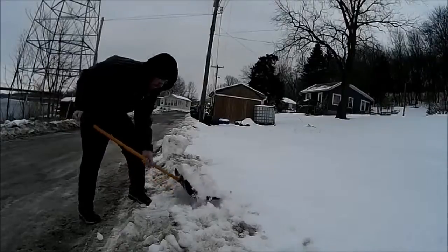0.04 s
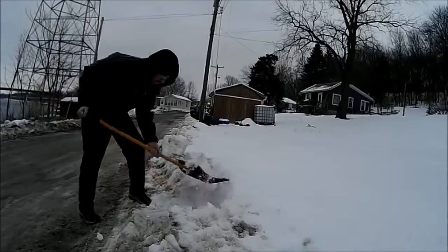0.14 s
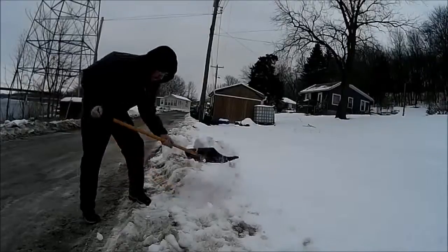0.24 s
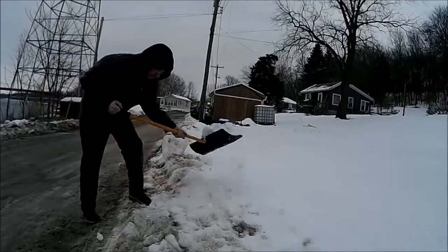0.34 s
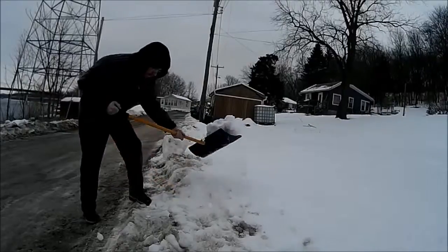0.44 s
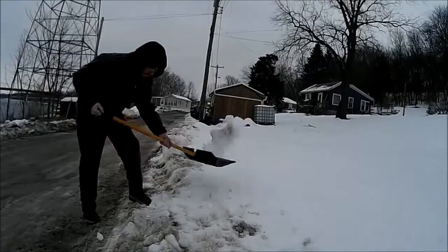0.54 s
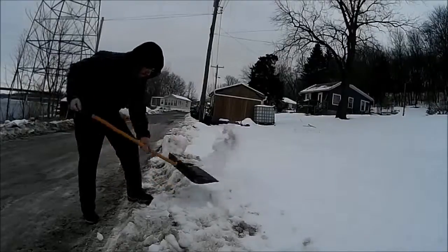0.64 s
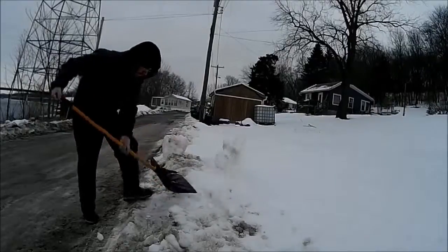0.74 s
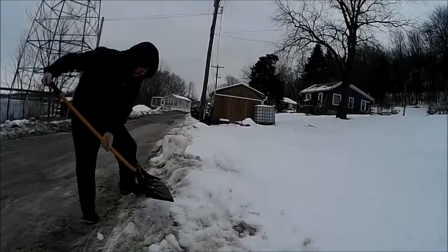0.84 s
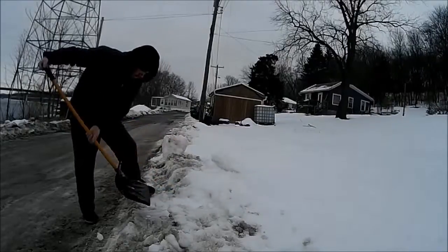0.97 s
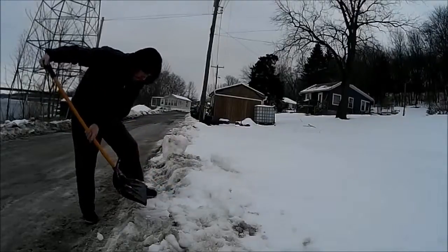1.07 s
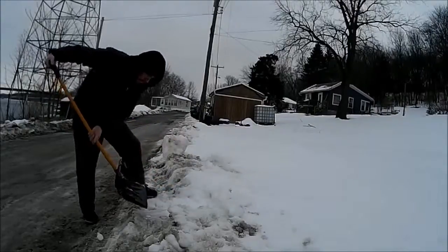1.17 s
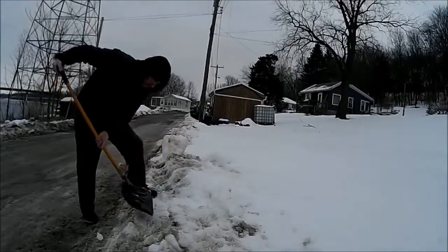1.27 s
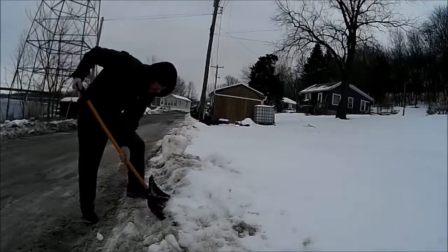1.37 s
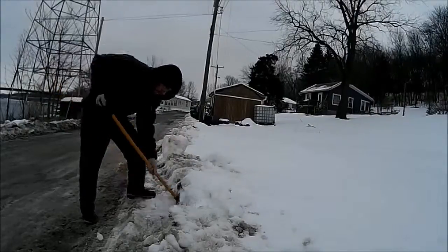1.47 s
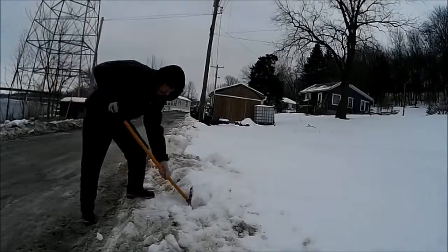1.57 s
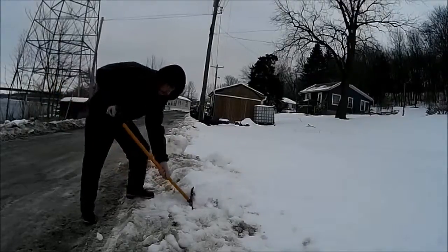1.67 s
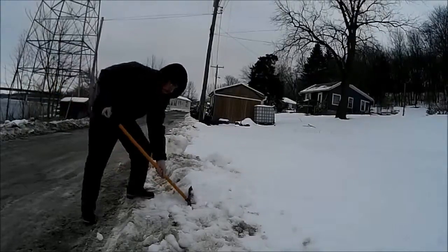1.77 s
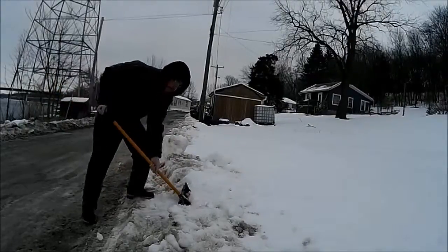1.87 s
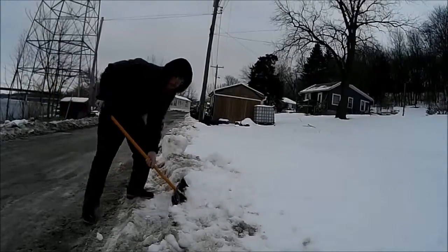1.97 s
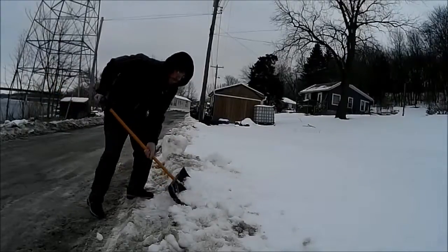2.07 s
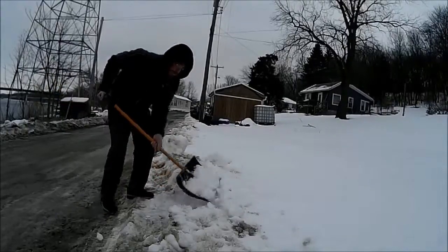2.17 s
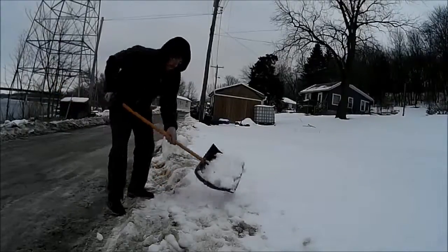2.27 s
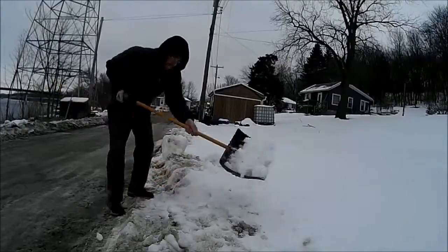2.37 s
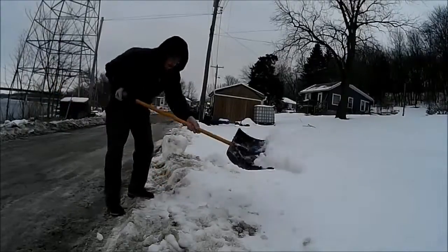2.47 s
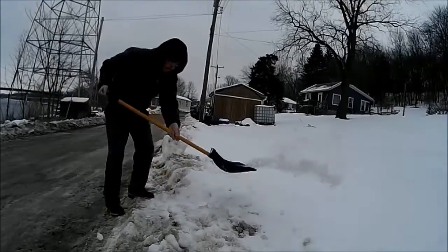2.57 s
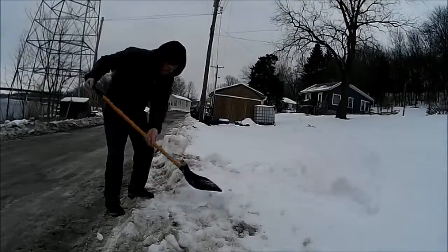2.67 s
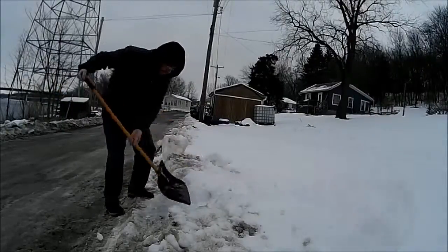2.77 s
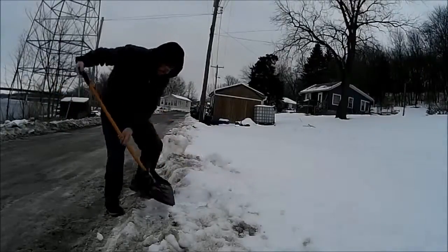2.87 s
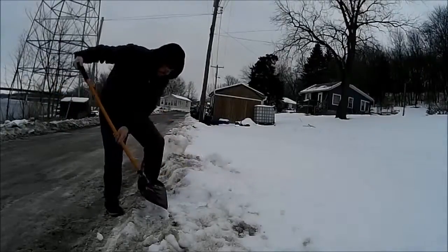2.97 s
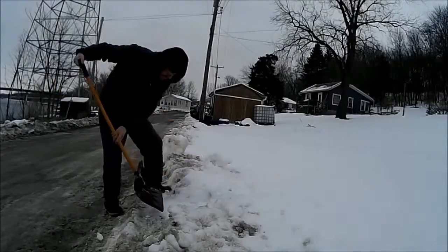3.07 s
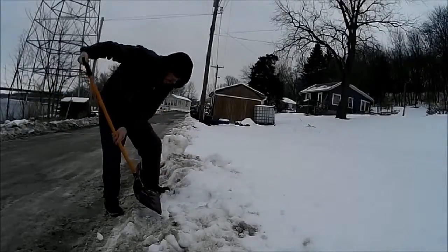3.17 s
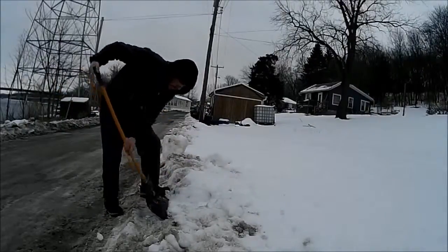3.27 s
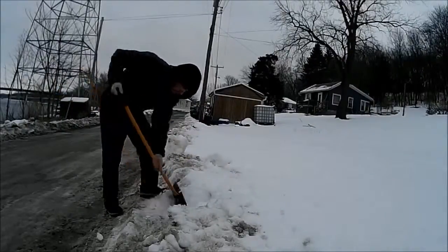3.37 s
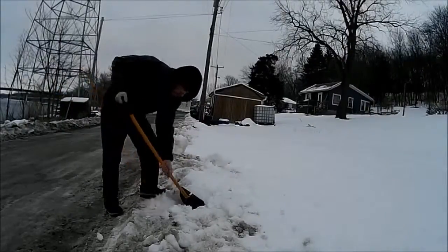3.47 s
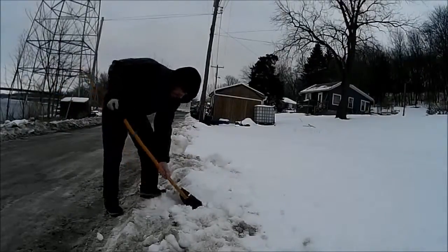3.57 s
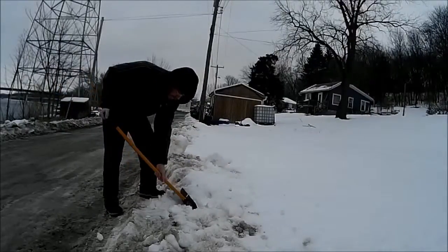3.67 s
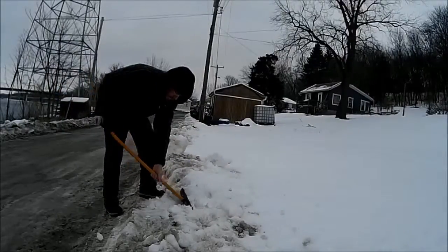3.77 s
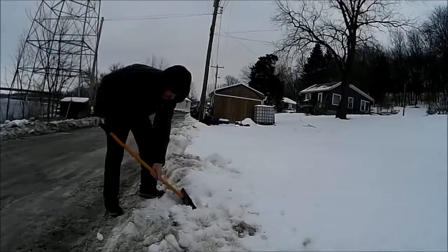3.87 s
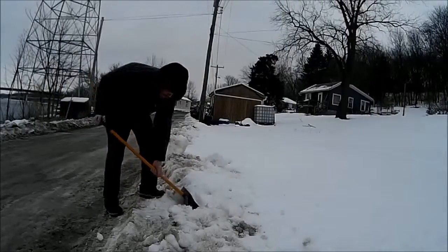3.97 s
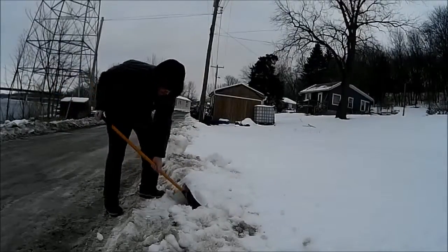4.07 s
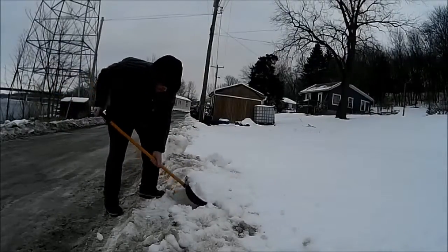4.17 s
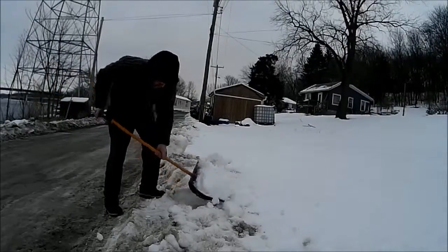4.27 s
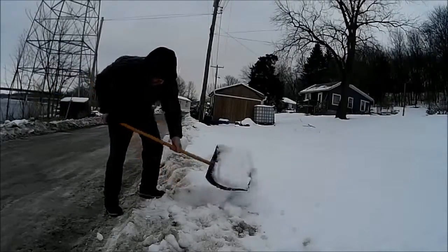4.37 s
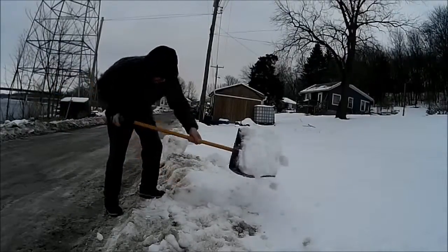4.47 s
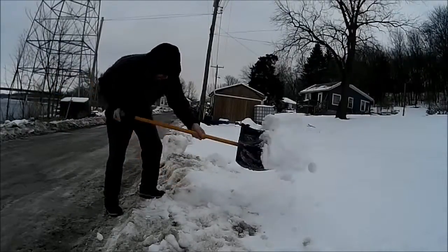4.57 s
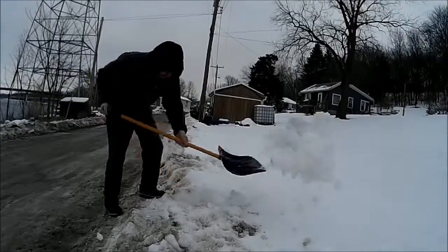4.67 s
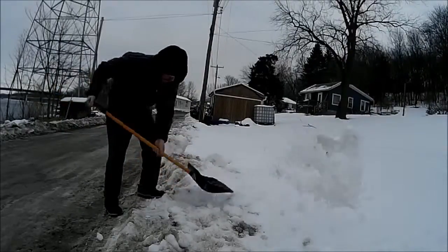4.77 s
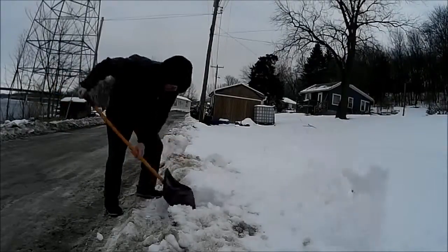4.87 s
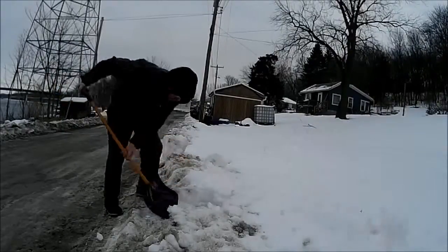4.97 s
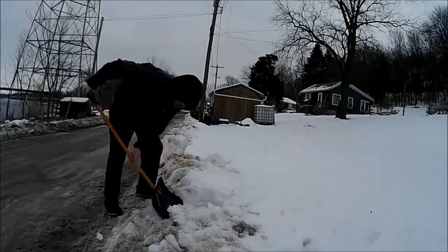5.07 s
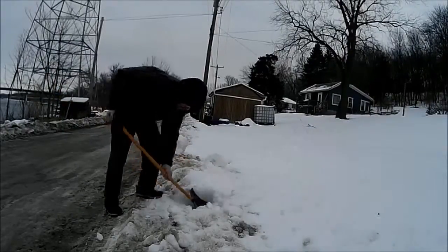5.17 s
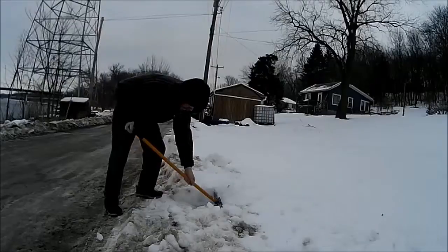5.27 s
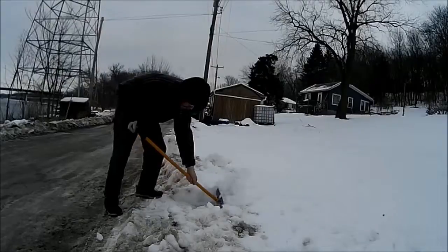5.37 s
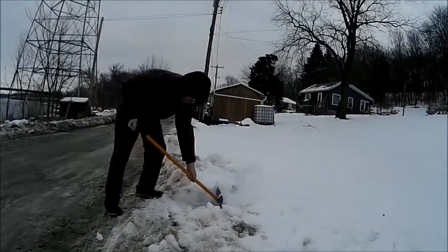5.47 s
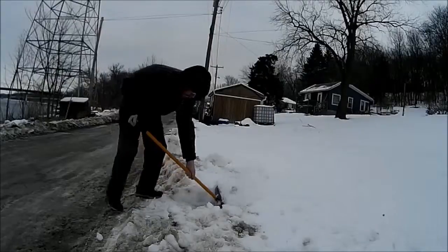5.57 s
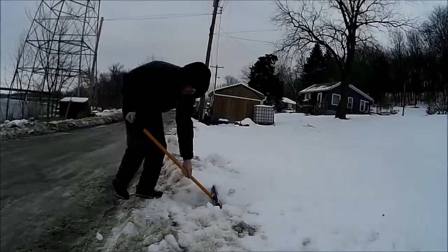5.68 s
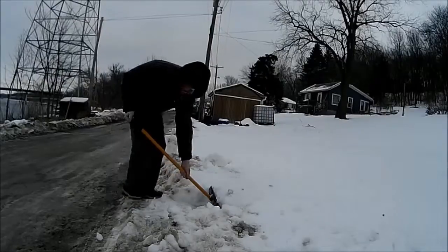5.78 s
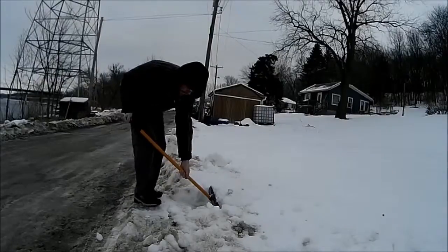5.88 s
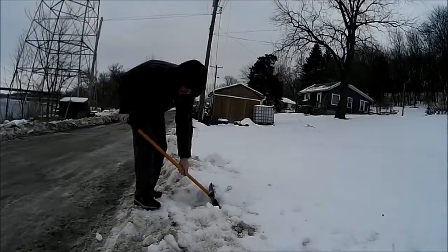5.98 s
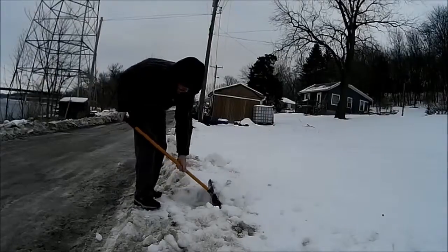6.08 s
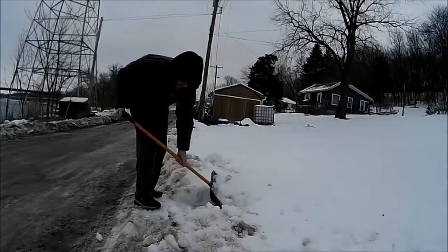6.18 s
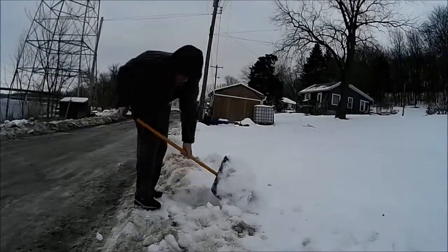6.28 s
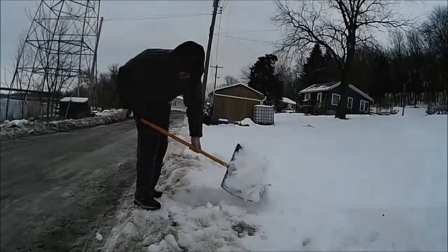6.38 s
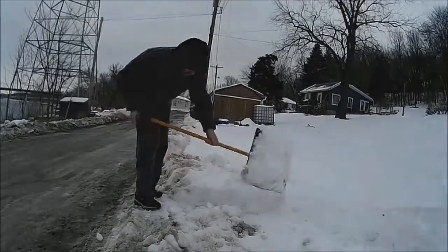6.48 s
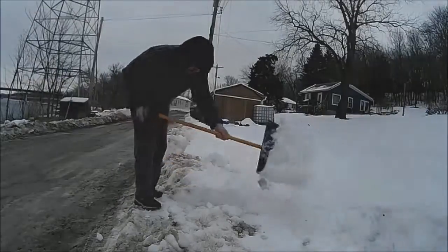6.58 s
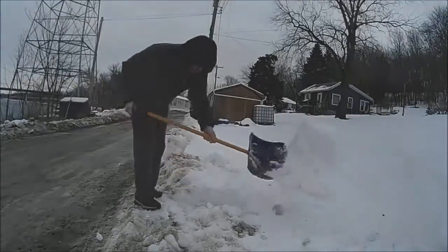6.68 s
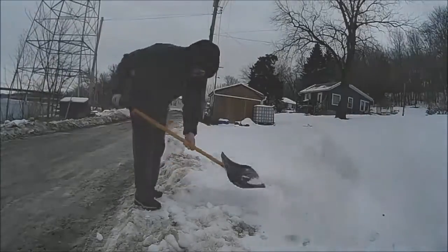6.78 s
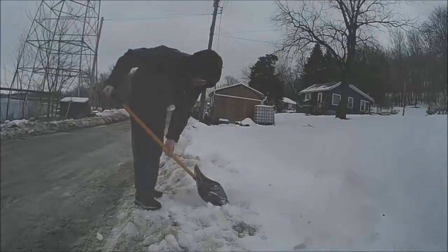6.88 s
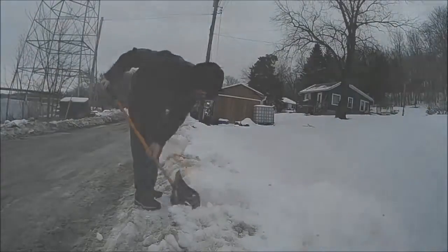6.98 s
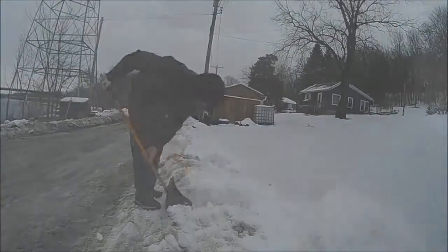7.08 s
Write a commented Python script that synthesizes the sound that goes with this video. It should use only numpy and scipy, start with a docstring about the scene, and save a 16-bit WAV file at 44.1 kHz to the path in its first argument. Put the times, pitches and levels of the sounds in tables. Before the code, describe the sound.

A shovel works on packed snow a few steps away, over a faint outdoor hush and the barely audible hum of a distant machine. It opens with a light scrape and small snap, and thrown snow patters softly down around 0.7 seconds. At 1.4 seconds the blade drives in with a loud, crackling crunch, followed by faint scraping and ticking crumbs, then a soft landing near 2.9 seconds. A second hard thrust comes at about 3.3 to 3.6 seconds, with light scrapes after it and a smaller crunch at 4.3. Scraping builds near 5 seconds into the third and sharpest dig, around 5.2. After a quiet moment, at 6.3 seconds flung snow strikes the microphone directly: a loud, close, grainy rush of powder with hard lumps knocking, briefly overloading it, over a slight low puff of wind. This lasts until the end, just past 7 seconds.

```python
"""A light scrape and a small snap: a few steps away, a shovel starts on packed snow, scoop after scoop.
Each thrust fractures icy grains, whose impulses excite the resonances of the blade; the load is
levered loose, thrown, and lands softly. At the end flung snow strikes the microphone's housing and
overloads it. Under it all lie a faint outdoor hush and the hum of a far machine."""
import sys
import numpy as np
from scipy import signal
from scipy.fft import rfft, irfft
from scipy.io import wavfile
from scipy.ndimage import uniform_filter1d

SR = 44100
rng = np.random.default_rng(int(sys.argv[2]) if len(sys.argv) > 2 else 0)


def master_out(mix):
    """Clip the mix to full scale and print it as 16-bit PCM to the path in sys.argv[1]."""
    frames = np.transpose(np.atleast_2d(mix))
    ceiling = np.clip(frames, -1, 1)
    pcm = np.round(ceiling * 32767).astype(np.int16)
    wavfile.write(sys.argv[1], SR, pcm)


N = 314433
TIME = np.arange(N) / SR
HZ = np.fft.rfftfreq(4096, 1 / SR)

# Crunch is the middle band; bass and fizz, the bands below and above, are always given relative to it.
# light contact as the load is levered, dragged and slid off:
# (start [s], length [s], relative crunch [dB], bass [dB], fizz [dB])
SCRAPES = [(-.03, 0.095, -56.5, -0.5, -5), (0.078, 0.25, -64.5, 2.5, -5), (0.408, 0.056, -56, -8.5, -10),
           (1.627, 0.18, -51, -3.5, -8.5), (1.804, 0.28, -46, -7.5, -11), (2.015, 0.39, -51, -5.5, -9),
           (2.414, 0.17, -46.5, -6.5, -11), (3.562, 0.085, -42, -6, -5.5), (3.654, 0.068, -36.5, -4, -3),
           (3.703, 0.067, -41, -12, -4), (3.744, 0.09, -55, 3, -6), (3.816, 0.24, -61, -4, -4.5),
           (4.106, 0.31, -54, -4.5, -4), (4.253, 0.054, -33, -14, -10), (4.292, 0.066, -47.5, -1, -5.5),
           (4.342, .58, -64.5, 1, -2.5), (4.498, 0.097, -54, -20, -9.5), (4.591, 0.092, -48.5, -7, -8.5),
           (4.944, 0.1, -48, -3.5, -1), (4.972, 0.34, -34, -18, -8.5), (5.307, 0.073, -33, -13, -8),
           (5.326, 0.13, -54, -2, -6), (5.587, 0.21, -56.5, -2, -7), (5.904, 0.57, -54, -1.5, -9)]
# resonances of the microphone's housing: (frequency [Hz], width [Hz], lift [dB])
HOUSING = [(476, 34, 0.5), (782, 330, 7), (1303, 66.5, 0.5), (2194, 60, 6.5), (2430, 190, 3.5),
           (2742, 320, 10), (3550, 640, 9.5), (4280, 170, 5.5), (5430, 370, 4.5), (6420, 540, 5),
           (7400, 810, 4), (10840, 370, 5.5), (12000, 1000, 3.5), (14600, 1000, 5.5)]


def shovel():
    """Forced vibration: snow fracturing against the blade excites its resonances."""
    # spectrum of crushed snow: (frequency [Hz], relative level [dB])
    crush = [(20, -45.5), (55, -21), (100, -14), (200, -6), (330, -7.5), (750, 5), (1300, 6.5), (2200, -14),
             (4300, -29), (6500, -15.5), (8300, -32), (10000, -32.5), (12500, -23), (14000, -33.5)]
    # resonances of the blade: (frequency [Hz], width [Hz], lift [dB])
    blade_modes = [(527, 197, 8.5), (1070, 91, -1), (1610, 323, 9), (2012, 190, 9), (2213, 200, 10),
                   (2560, 324, 7.5), (3224, 630, 11), (3634, 465, 14), (4020, 120, 5.5), (4270, 200, 11),
                   (4585, 240, 10.5), (5384, 470, 11), (6050, 240, 2.5), (7440, 900, 11.5), (7900, 160, 4),
                   (8580, 550, 14), (9390, 710, 12.5), (10330, 230, 15.5), (10820, 580, 4.5),
                   (11350, 1100, 10.5), (14030, 410, 3), (15210, 1100, 8)]
    # the blade driven into the bank: (start [s], push [s], ease [s], stop [s], relative peak [dB],
    # relative stall [dB], bass [dB], fizz at the peak [dB], fizz at the stall [dB])
    thrusts = [(1.365, 0.084, 0.21, 0.026, -22, -24.5, -16, -4.5, -10.5),
               (3.286, 0.14, 0.083, 0.048, -19, -19.5, -11.5, -2, -1),
               (5.135, 0.087, 0.08, 0.055, -11.5, -23.5, -16, -7, -7)]
    # crust snapping on the blade: (time [s], peak [dB], bass [dB], fizz [dB], t60 [s])
    snaps = [(.013, -44, -8.5, 6, 0.029), (1.031, -49, -15, -8, .03), (1.365, -30, -26, -21, .028),
             (1.377, -35, -6, 0, 0.22), (1.423, -15.5, 4, -4, 0.034), (1.462, -17, -6, -27, 0.036),
             (1.497, -14, 4, -18, 0.015), (1.57, -13, -14.5, -3, 0.091), (2.078, -32.5, -3, -12, 0.038),
             (2.092, -31, -7, -12, 0.029), (2.259, -35.5, -10, -4, 0.025), (2.298, -40, -1, -26, 0.081),
             (2.421, -39.5, -23, -21, 0.086), (2.496, -29.5, -19, -13, 0.089), (3.296, -24, -14, 4, 0.048),
             (3.409, -5, -7, -11, 0.012), (3.418, -5, -21, -4, 0.059), (3.564, -30.5, -11, -2, .045),
             (3.663, -35, -19, 4, 0.03), (3.779, -30.5, -2, -11, 0.01), (3.856, -40, 1, -7, 0.056),
             (3.943, -42, 0.5, -3, 0.031), (4.272, -20, 3.5, -5, 0.044), (4.296, -23, -10, -21, 0.017),
             (4.657, -38, -18.5, 7, 0.036), (4.995, -25.5, -14, -10, 0.051), (5.066, -23, -30, -7, 0.023),
             (5.074, -19, -16, 10, 0.0045), (5.153, -16, -14, 3, .035), (5.189, -7, -8, -11, 0.06),
             (5.214, 0.5, -28, -9.5, 0.038), (5.279, -6, -26, -26, 0.019)]
    blade = colour(crush, blade_modes)
    body = registers(blade)
    digs = [thrust(*row) for row in thrusts]
    drags = [swell(*row, roundness=0.62, skew=0.75) for row in SCRAPES]
    grind = grains(digs, body, per_s=14000, lumps_per_s=1600, spread_db=1.5,
                   slip_db=0.86, slip_hz=220, surge_db=0.04)
    scrape = grains(drags, body, per_s=7000, lumps_per_s=1500, spread_db=3.2,
                    slip_db=0.5, slip_hz=220, surge_db=1.26)
    low_cut = 1 + (170 / (HZ + 1)) ** 3  # a single lump is too small to push deep bass
    cracks = knocks(snaps + crumbs(), registers(blade / low_cut))
    return gain_of(-2.0) * drifting(grind + scrape, patchy_db=2.5) + cracks


def thrust(start, push_s, ease_s, stop_s, peak_db, stall_db, bass_db, peak_fizz_db, stall_fizz_db):
    """Loading and release: the level of a thrust builds with the push and falls as the blade stalls."""
    peak_s = start + push_s
    light_bass_db = bass_db - 3  # few big lumps break before and after the hardest push
    bite_fizz_db = -3.5  # the edge still cuts loose crystals
    return [(start, -34.5, light_bass_db, bite_fizz_db),  # bite
            (start + min(0.033, push_s), -26.5, light_bass_db, bite_fizz_db),  # grip
            (peak_s, peak_db, bass_db, peak_fizz_db),
            (peak_s + ease_s, stall_db, light_bass_db, stall_fizz_db),
            (peak_s + ease_s + stop_s, -56, light_bass_db, stall_fizz_db)]


def swell(start, length, db, bass_db, fizz_db, roundness, skew):
    """Amplitude envelope of a soft contact: one arch, peaking early if skew is under 1."""
    progress = np.linspace(0, 1, 31)
    arch_db = 20 * np.log10(abs(np.sin(np.pi * progress ** skew)) + 1e-2)
    return [(start + u * length, db + roundness * a, bass_db, fizz_db) for u, a in zip(progress, arch_db)]


def crumbs(per_s=24, lift_db=3, bass_db=-15, fizz_db=-2.5, t60=0.019):
    """Brittle fracture: ice crumbs tick at random during the scrapes, louder in a harder one."""
    times = rng.uniform(0, N / SR, round(per_s * N / SR))
    return [(s, db + lift_db, bass_db, fizz_db, t60)
            for s in times for start, length, db, *_ in SCRAPES if start < s < start + length]


def shower():
    """Impact excitation: flung powder and lumps ring the housing right at the microphone."""
    # spectrum of snow on the housing: (frequency [Hz], relative level [dB])
    patter = [(40, -26.5), (130, -12), (250, -13), (430, 1.5), (800, -2), (1400, 5), (2000, -2),
              (3100, -18), (4500, -14), (6000, -23), (10000, -23), (14000, -33.5), (16000, -30)]
    # sheets of powder: (start [s], rise [s], hold [s], fall [s], crunch [dB], bass [dB], fizz [dB])
    sheets = [(6.316, 0.0055, 0.36, 0.1, -17, -15, -1), (6.782, 0.08, .28, .05, -14, -8.5, -7.5)]
    # denser clumps bursting within the sheets: (start [s], length [s], crunch [dB])
    clumps = [(6.329, 0.052, -8.5), (6.438, 0.071, -11.5), (6.599, .1, -13), (6.896, .105, -10)]
    # lumps striking the housing: (time [s], peak [dB], fizz [dB], t60 [s])
    pelts = [(6.318, -6, -7, 0.016), (6.354, -2.5, 19, 0.022), (6.399, -5, -21, .025),
             (6.446, 6, 0.5, 0.048), (6.651, 3.5, -13, 0.014), (6.67, -0.5, 8, 0.015),
             (6.723, -5, -29, 0.068), (6.786, -12, -3.5, 0.026), (6.834, -3.5, -8, 0.015),
             (6.977, 7, -4, 0.063), (7.122, 2.5, -3.5, 0.054)]
    housing = registers(colour(patter, HOUSING))
    flurries = [sheet(*row) for row in sheets]
    flurries += [swell(*row, bass_db=-18.5, fizz_db=-4.5, roundness=0.7, skew=0.97) for row in clumps]
    powder = grains(flurries, housing, per_s=14000, lumps_per_s=1100, spread_db=2.0,
                    slip_db=0.4, slip_hz=240, surge_db=1.24, thinning=0.48)
    lump_bass_db = -14
    lumps = [(s, db, lump_bass_db, fizz_db, t60) for s, db, fizz_db, t60 in pelts]
    return drifting(powder, patchy_db=1.5) + knocks(lumps, housing)


def sheet(start, rise_s, hold_s, fall_s, db, bass_db, fizz_db):
    """Amplitude envelope of a sheet of powder: it arrives, pours evenly and thins out."""
    times = start + np.cumsum([0, rise_s, hold_s, fall_s])
    return [(s, db + step_db, bass_db, fizz_db) for s, step_db in zip(times, [-14, 0, 0, -24.5])]


def landing():
    """Damped impacts: crumbs patter and clods thud on snow, coloured by the microphone's housing."""
    # spectrum of snow falling on snow: (frequency [Hz], relative level [dB])
    fall = [(40, -6.5), (300, -7), (520, 2.5), (800, -5), (1100, 4), (1400, -0.5), (2000, -9), (2800, -23),
            (3500, -20), (4300, -19.5), (5200, -16), (8000, -21.5), (11000, -16.5), (14000, -26),
            (16000, -23)]
    # thrown snow coming down: (start [s], length [s], crunch [dB], bass [dB], fizz [dB])
    landings = [(0.641, 0.34, -54, -7.5, -8), (2.841, 0.14, -50, -9, -2), (2.966, .21, -56.5, -11, -8.5)]
    # clods and boots on the snow: (time [s], peak [dB], bass [dB], fizz [dB], t60 [s])
    thuds = [(.2, -43, -14, -14, .025), (.643, -40.5, -12, -14, 0.014), (.682, -44, -16, -14, 0.018),
             (.785, -39.5, -7, -20, 0.024), (.809, -38.5, -13, -15, .03), (1.005, -41.5, -12, -20, 0.021),
             (1.324, -46, -10, -22, .1), (2.73, -38.5, -5, -23, 0.0084), (2.934, -36.5, -4, -22, 0.027),
             (3.077, -41, -16, -17, .04)]
    lawn = registers(colour(fall, HOUSING))
    loads = [swell(*row, roundness=0.84, skew=0.75) for row in landings]
    patter = grains(loads, lawn, per_s=9000, lumps_per_s=600, spread_db=2.0,
                    slip_db=0.5, slip_hz=160, surge_db=3.0, surge_hz=39.8)
    return patter + knocks(thuds, lawn)


def grains(contacts, body, per_s, lumps_per_s, spread_db, slip_db, slip_hz, surge_db,
           surge_hz=40, thinning=0.3):
    """Shot noise: countless tiny fractures, bunched by stick and slip, ring a body."""
    levels = np.zeros((3, N))
    for contact in contacts:
        s, crunch_db, bass_db, fizz_db = np.transpose(contact)
        during = (TIME >= s[0]) & (TIME <= s[-1])
        for level, db in zip(levels, (crunch_db + bass_db, crunch_db, crunch_db + fizz_db)):
            level[during] = np.hypot(level[during], gain_of(np.interp(TIME[during], s, db)))  # powers add
    busy = (levels[1] / levels[1].max() + 1e-4) ** thinning  # light contact breaks fewer grains
    bunching = evened(gain_of(slip_db * wander(slip_hz) + surge_db * wander(surge_hz)))
    chance, out = rng.random(N), np.zeros(N)
    for level, response, rate in zip(levels, body, (lumps_per_s, per_s, per_s)):
        probability = np.minimum(rate * busy / SR, 1)
        size = evened(gain_of(spread_db * np.minimum(rng.exponential(1, N), 4)))
        polarity = rng.choice([-1, 1], N)
        clicks = (chance < probability) * size * polarity / np.sqrt(probability)
        out += signal.oaconvolve(level * bunching * clicks, response)[:N]
    return out


def knocks(rows, body):
    """Exponential decay: each lump gives way in a dying cascade of cracks that rings a body."""
    out, t = np.zeros(N), np.arange(SR // 6) / SR
    for s, peak_db, bass_db, fizz_db, t60 in rows:
        cascades = rng.standard_normal((3, len(t))) * np.exp(-np.log(1000) * t / t60)
        bands = [evened(signal.fftconvolve(c, response)) for c, response in zip(cascades, body)]
        sound = gain_of([bass_db, 0, fizz_db]) @ np.array(bands)
        add(out, s, gain_of(peak_db) * sound / abs(sound).max())
    return out


def drifting(x, patchy_db, span_hz=170, span_s=0.075):
    """Variable loading: the snow shifts, so single resonances swell and sink during contact."""
    frame, hop = 1024, 256
    spectra = signal.stft(x, nperseg=frame, noverlap=frame - hop)[2]
    patches = rng.standard_normal(spectra.shape[::-1]).T
    patches = uniform_filter1d(patches, round(span_hz * frame / SR), axis=0)
    patches = uniform_filter1d(patches, round(span_s * SR / hop), axis=1)
    spectra *= evened(gain_of(patchy_db * evened(patches)))
    in_contact = abs(x) > 1e-9
    return in_contact * signal.istft(spectra, nperseg=frame, noverlap=frame - hop)[1][:N]


def colour(points, modes=()):
    """Frequency response: a broad spectrum lifted at each resonance."""
    f, db = np.transpose(points)
    broad_db = np.interp(np.log(HZ + 1), np.log(f), db)
    lift_db = sum(lift * 2 ** -((2 * (HZ - hz) / width) ** 2) for hz, width, lift in modes)
    return gain_of(broad_db + lift_db)


def registers(gain, low_hz=380, high_hz=2500):
    """Band splitting: impulse responses to big lumps (bass), grains (crunch) and fine crystals (fizz)."""
    above_low, above_high = (1 / (1 + (hz / (HZ + 1)) ** 10) for hz in (low_hz, high_hz))
    power_shares = (1 - above_low, above_low * (1 - above_high), above_high)
    return [ring(gain * np.sqrt(share)) for share in power_shares]


def ring(gain):
    """Minimum phase: the causal impulse response of energy 1 with this spectral shape."""
    log_gain = np.log(np.maximum(gain / gain.max(), 1e-5))
    mirrored = np.r_[log_gain, log_gain[-2:0:-1]]
    spectrum = np.exp(np.conj(signal.hilbert(mirrored)))
    response = np.fft.ifft(spectrum).real[:len(HZ)]
    return response / np.linalg.norm(response)


def yard(x, t60=0.55, dull_hz=2200, build_s=0.022):
    """Reverberation: trees and houses scatter the sound into a dull tail."""
    t = np.arange(SR) / SR
    tail = rng.standard_normal(SR) * np.exp(-np.log(1000) * t / t60) * (1 - np.exp(-t / build_s))
    tail = signal.sosfilt(signal.butter(1, dull_hz, fs=SR, output="sos"), tail)
    return signal.oaconvolve(x, tail / np.linalg.norm(tail))[:N]


def air(hush_db=-57, gust_band_hz=(35, 94.5)):
    """Ambient noise and turbulence: a slowly swelling hush and a low puff of wind."""
    # spectrum of the outdoor hush: (frequency [Hz], relative level [dB])
    hush_spectrum = [(60, 1.5), (100, -3.5), (160, -0.5), (235, -2.5), (330, -4.5), (420, -8.5),
                     (540, -2.5), (700, -4), (1000, -5.5), (1500, -13.5), (2000, -21.5), (3000, -23.5),
                     (12000, -23.5), (15600, -28)]
    # wind on the microphone: (time [s], level [dB])
    gust = [(5.9, -76), (6.051, -61), (6.121, -48), (6.3, -61), (6.6, -42), (6.85, -47), (7.0, -43),
            (7.13, -45)]
    noise = rng.standard_normal(N + len(HZ) - 1)
    hush = evened(signal.fftconvolve(noise, ring(colour(hush_spectrum)), "valid"))
    gust_band = signal.butter(2, gust_band_hz, "band", fs=SR, output="sos")
    rumble = evened(signal.sosfilt(gust_band, rng.standard_normal(N)))
    s, db = np.transpose(gust)
    puff = gain_of(np.interp(TIME, s, db)) * (TIME > s[0])
    return gain_of(hush_db + 1.4 * wander(0.75)) * hush + puff * rumble


def hum(waver_hz=2.56, waver_db=3.5):
    """Amplitude and frequency modulation: the tones of a far machine waver on the way."""
    # tones of the machine: (frequency [Hz], mean rms level [dB])
    tones = [(142, -74), (201, -74), (237, -69.5), (576, -70.5)]
    out = np.zeros(N)
    for hz, db in tones:
        amplitude = np.sqrt(2) * gain_of(db + waver_db * wander(2.4))
        phase = 2 * np.pi * np.cumsum(hz + waver_hz * wander(2.8)) / SR
        out += amplitude * np.sin(phase)
    return out


def wander(hz):
    """Low-pass noise: a random drift of rms 1 that rolls off above hz."""
    f = np.fft.rfftfreq(N, 1 / SR)
    return evened(irfft(rfft(rng.standard_normal(N)) / (1 + (f / hz) ** 4), N))


def gain_of(db):
    """Decibels to amplitude."""
    return 10 ** (np.asarray(db) / 20)


def evened(x):
    """Normalisation to rms 1."""
    return x / np.sqrt(np.mean(x ** 2) + 1e-20)


def add(mix, s, sound):
    """Superposition of a sound onto the mix at time s."""
    part = mix[max(round(s * SR), 0):][:len(sound)]
    part += sound[:len(part)]


def scene():
    """Superposition: the shovelling and its weak reverberation, the shower, the air and the hum."""
    work = shovel() + landing()
    return (work + gain_of(-37.0) * yard(work) + shower() + air() + hum())[None]


def record(dry, ceiling=0.77, edge_hz=15850):
    """Saturation flattens the loudest peaks; a low-pass filter then limits the band."""
    limited = dry / (1 + (dry / ceiling) ** 6) ** (1 / 6)
    low_pass = signal.firwin(511, edge_hz, window=("kaiser", 9), fs=SR)
    return signal.oaconvolve(limited, low_pass[None], "same")


dry = scene()
out = record(dry)
master_out(out)
```